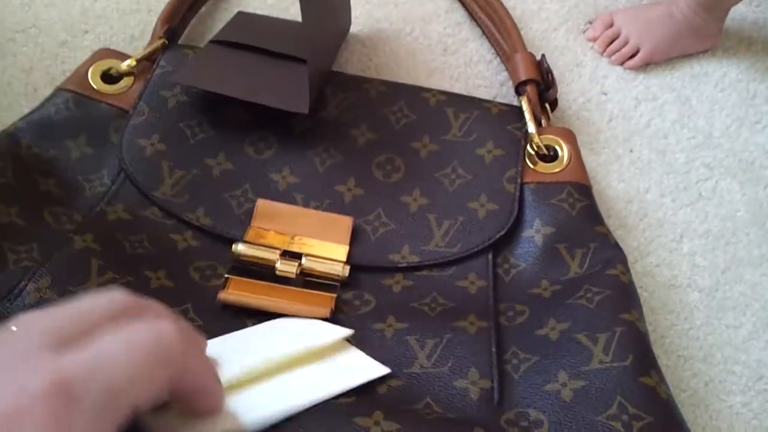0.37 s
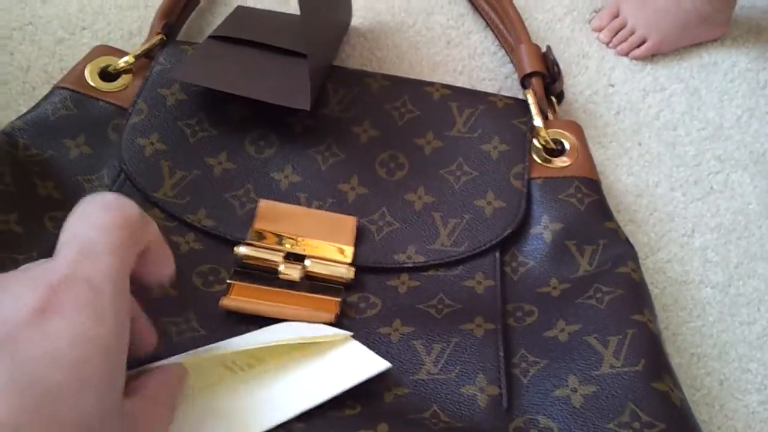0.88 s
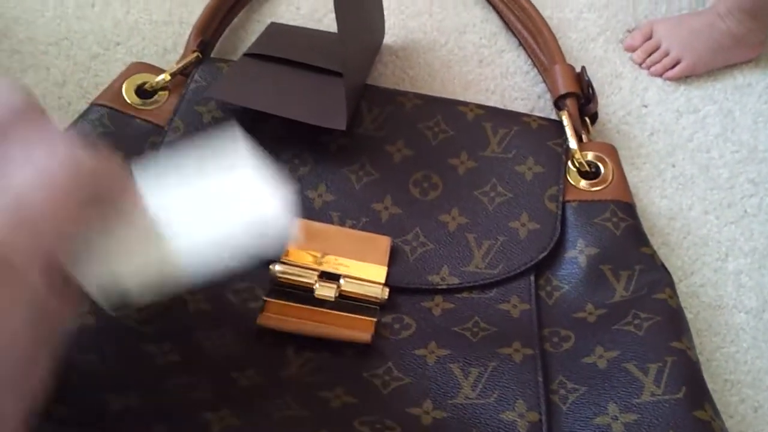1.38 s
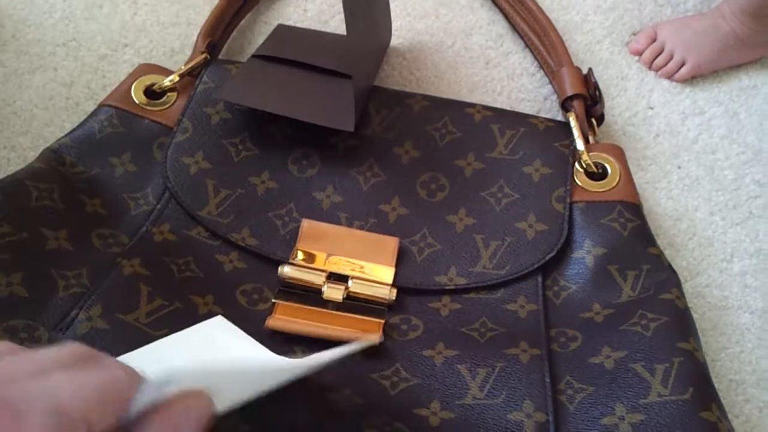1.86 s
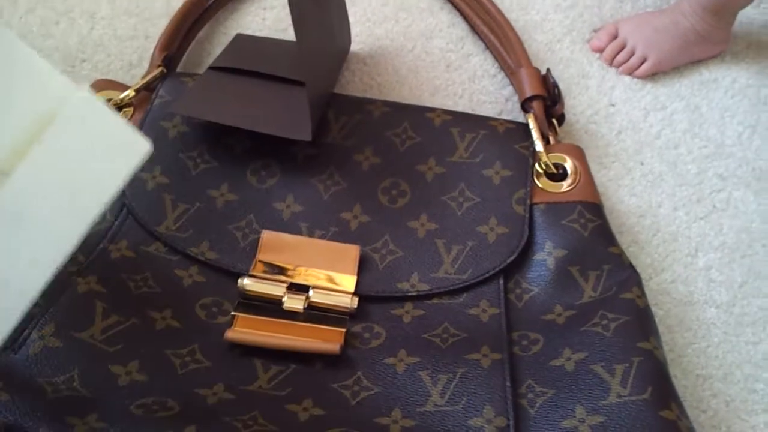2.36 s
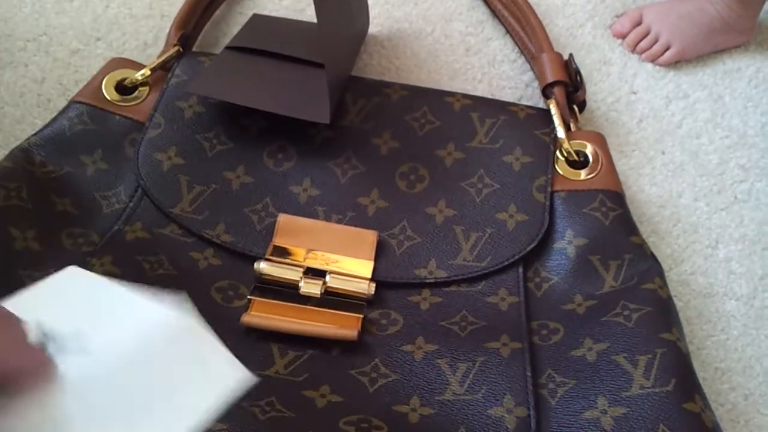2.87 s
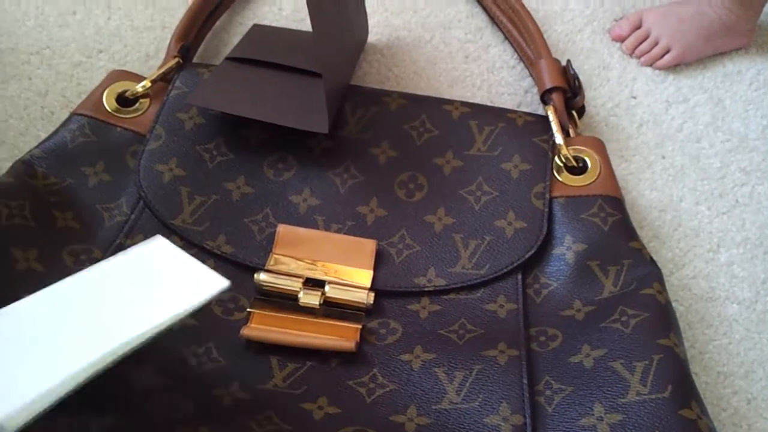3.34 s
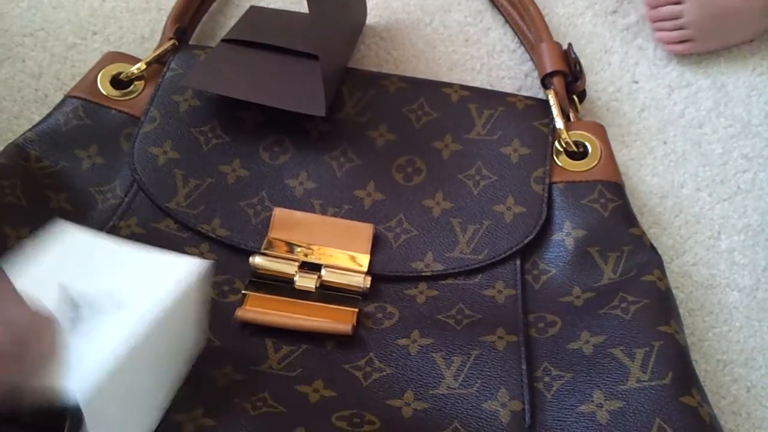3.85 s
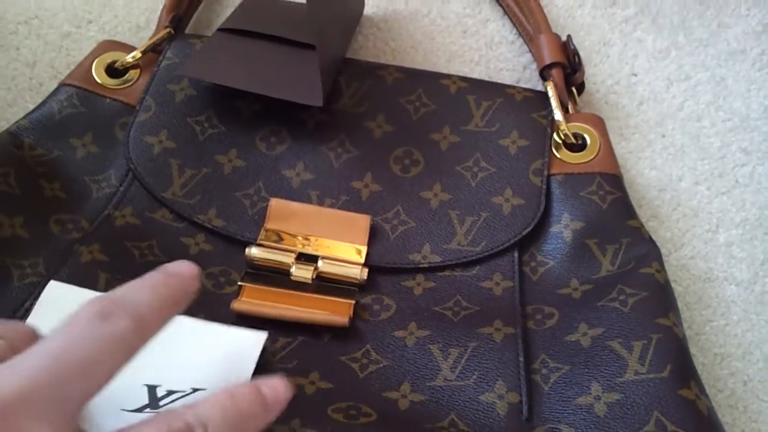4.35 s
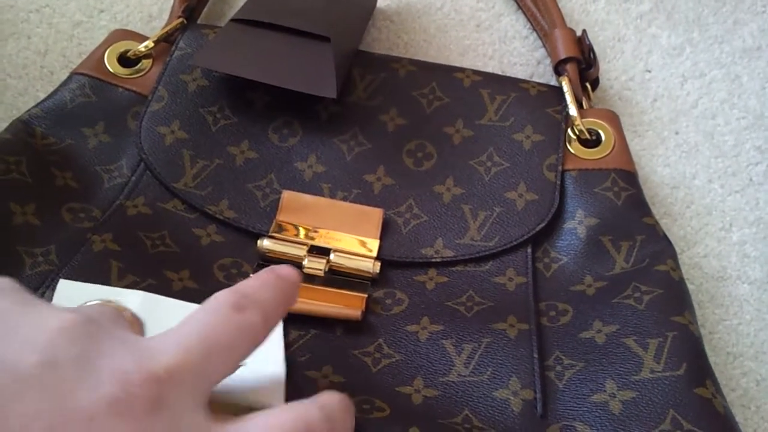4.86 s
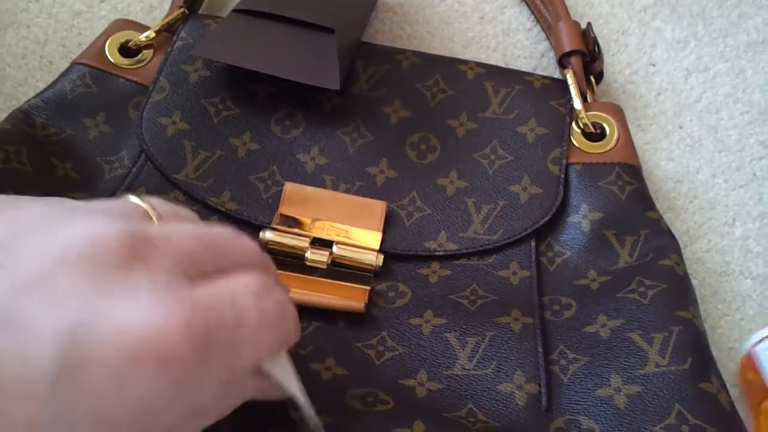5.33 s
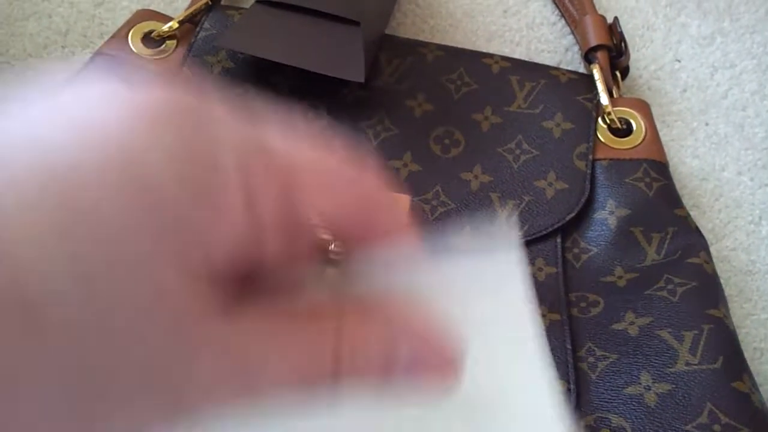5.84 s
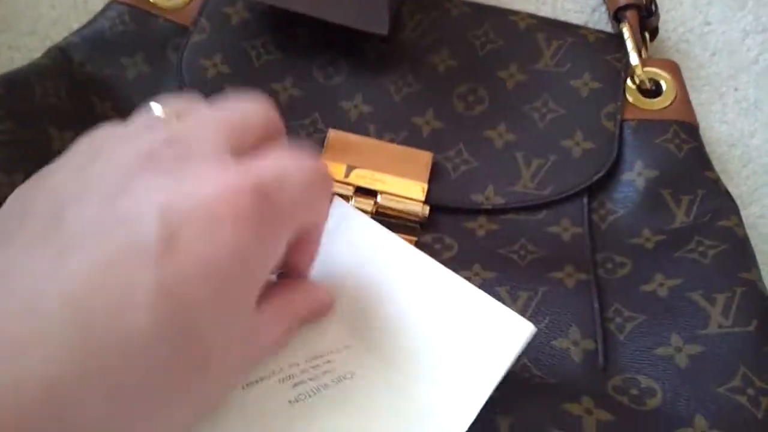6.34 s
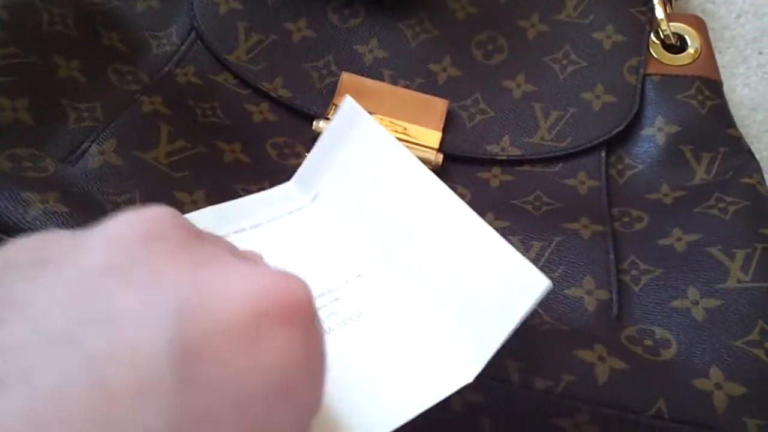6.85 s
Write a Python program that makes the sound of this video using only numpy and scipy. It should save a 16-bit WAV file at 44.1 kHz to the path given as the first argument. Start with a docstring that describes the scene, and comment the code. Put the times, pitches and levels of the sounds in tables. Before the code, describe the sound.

A soft, steady room hush with stiff paper handled very close to one microphone. Faint rustles and small ticks come first; around 0.4 s sharp crease snaps launch a bright, gritty slide of paper on card, fading by about 1 s. Light crinkles and clicks follow, with a strong snap at 1.55 s and a second harsh slide at 1.7-2.2 s, its loudest crack near 1.8 s. Quiet rustling until a third snapping slide at 3.25-3.7 s. From 3.8 to 4.7 s only small rustles, soft fingertip taps and a thin finger scuff. At 4.8 s a short slide, then the loudest snaps at 5.0-5.1 s, clipping slightly, and further rasping slides to 5.7 s. Duller, woody pops and low finger thumps at 5.5, 5.8 and 6.05 s, then rustling and light creases settle to hush, with a last small tick near 6.9 s. Very little reverberation.

```python
"""Faint papery rustling over a soft hush, then creases snapping and hard slides of paper on paper.
A stiff card and a folded sheet are slid apart, opened and tapped by hand, close up in a carpeted room.
Rubbing is clumped micro-slips, noise bursts that ring the card; snaps are short decaying pops and noise.
Fingertips thump softly in low-mid noise; a finger scuff is one narrow band of noise.
One microphone hears it all, and the loudest peaks clip."""
import sys
import numpy as np
from scipy import signal
from scipy.fft import rfft, irfft, next_fast_len
from scipy.io import wavfile
from scipy.ndimage import uniform_filter1d, map_coordinates

SR = 44100
rng = np.random.default_rng(int(sys.argv[2]) if len(sys.argv) > 2 else 0)


def ratio(d):
    """dB to gain"""
    e = np.asarray(d, float) / 20
    return 10 ** e


def bounce(signal):
    """Save signal as a 16-bit WAV file at the path given by the first command-line argument."""
    frames = np.transpose(np.atleast_2d(signal))
    limited = np.clip(frames, -1, 1)
    pcm = np.round(limited * 32767).astype(np.int16)
    wavfile.write(sys.argv[1], SR, pcm)


N = 307083  # samples

# colour of fingertips on paper, mostly low mids: pitch_hz, level_db
FINGER_COLOUR = [(20, -58), (60, -48), (120, -24), (250, -0.5), (500, -1), (900, -2), (1600, -23)]


def unit(x):
    """Scales to an rms of 1."""
    return x / np.sqrt(np.mean(x ** 2) + 1e-20)


def filtered(x, response):
    """Multiplies the spectrum of x by a response given as a function of frequency."""
    m = 2 * next_fast_len(N // 2 + 4096)
    spectrum = rfft(x, m) * response(np.fft.rfftfreq(m, 1 / SR))
    return irfft(spectrum, m)[..., :N]


def coloured(x, points):
    """Minimum-phase filter through (Hz, dB) points on a log axis, so that nothing sounds before a hit."""
    f, db = np.transpose(points)

    def response(hz):
        cepstrum = irfft(np.log(ratio(np.interp(np.log(hz + 1), np.log(f), db))))
        half = len(cepstrum) // 2
        # folding the cepstrum onto its causal half gives minimum phase
        cepstrum[1:half] *= 2
        cepstrum[half + 1:] = 0
        return np.exp(rfft(cepstrum))
    return filtered(x, response)


def tinted(x, points):
    """Zero-phase filter through (Hz, dB) points, so that neighbouring bands of noise add up smoothly."""
    f, db = np.transpose(points)
    return filtered(x, lambda hz: ratio(np.interp(np.log(hz + 1), np.log(f), db)))


def wobble(rate):
    """A smooth random curve with rate knots a second."""
    knots = rng.standard_normal(int(N * 2000 / SR) + 4)
    return map_coordinates(knots, [np.arange(N) * rate / SR])


def port(x):
    """The microphone port lifts three bands and slightly dips one."""
    # port bands: pitch_hz, width_hz, gain_db
    port_bands = [(3530, 58, -2), (4790, 770, 2.5), (5450, 100, 5), (7500, 1470, 4.5)]

    def response(f):
        return 1 + sum((ratio(db) - 1) * 1j * f * w / (c * c - f * f + 1j * f * w) for c, w, db in port_bands)
    return filtered(x, response)


def slips(rate, spread_db, life_s, clump_db, hiss):
    """Fibres catch and let go: noise bursts of very unequal size, in clumps, over smooth hiss."""
    when, size = rng.random((2, N))
    starts = (when < rate / SR) * ratio(-spread_db * np.log(size + 0.045))
    bursts = signal.lfilter([1], [1, -np.exp(-1 / (life_s * SR))], starts)
    clumps = ratio(clump_db * (wobble(22) + wobble(70)))
    return unit(clumps * (unit(bursts) + hiss) * rng.standard_normal(N))


def card(x, patchy_db):
    """The card rings at pitches that move as it is bent, and its colour flickers in patches."""
    # broad resonances of the card, unbent and fully sounding: pitch_hz, width_hz, gain_db
    card_modes = [(1450, 170, 6), (2150, 190, 10), (2850, 200, 3)]
    # how the card is held: time_s, stretch of its resonances (ratio), share of their gain in dB (0-1)
    grips = [(.3, 1, 0.85), (.95, 1.13, 0.93), (1.6, 1.07, 0.92), (2.25, 1, 1), (2.5, 0.85, 0),
             (3.2, 1, 0.83), (3.7, 1.07, 1), (4.2, 0.87, 0), (4.75, 1.06, 0.95), (5.1, 0.95, 0.58),
             (5.699, 1, 1), (5.85, 0.95, 0.18)]
    hz, t, z = signal.stft(x, SR, nperseg=512)
    s, stretch, share = np.transpose(grips)
    bent = hz[:, None] / np.interp(t, s, stretch)
    lift_db = sum(db / (1 + (2 * (bent - c) / w) ** 2) for c, w, db in card_modes)
    lift_db = lift_db * np.interp(t, s, share)
    across_pitch = uniform_filter1d(rng.standard_normal(z.shape), size=5, axis=0)
    patches = unit(uniform_filter1d(across_pitch, size=10, axis=1))
    return signal.istft(z * ratio(lift_db + patchy_db * patches), SR, nperseg=512)[1][:N]


def past(seconds):
    """Time beyond a moment, zero ahead of it."""
    return np.clip(seconds, 0, None)


def rustle_power(t):
    """Light handling swells, holds and settles: power of fibres, card, fingers and glide."""
    # rustles: full_from_s, full_to_s, fibres_db, card_db and fingers_db (both relative to fibres)
    rustles = [(0, 0.038, -43.5, -5.5, -11), (0.103, 0.122, -53, -10, -13), (0.283, 0.367, -46, -7, -9.5),
               (1.037, 1.072, -37, -1.5, -3.5), (1.138, 1.22, -47.5, -3.5, -10),
               (1.44, 1.567, -48, -6.5, -6.5), (1.572, 1.636, -48, -9, -6),
               (2.338, 2.338, -42.5, -5.5, -13.5), (2.43, 2.475, -53, 3, -6.5),
               (2.519, 2.543, -43, -3, -23.5), (2.615, 2.7, -47, -4.5, -19.5), (2.833, 2.863, -47, -1, -4),
               (2.993, 3.03, -46, -1, -8), (3.142, 3.17, -47, -0.5, -9), (3.217, 3.236, -37, -1.5, -13),
               (3.817, 3.8, -51, 3.5, 8), (3.865, 3.914, -41.5, 0, -16), (3.953, 4.044, -44, -4.5, -15),
               (4.18, 4.286, -59, -11, -3), (4.367, 4.448, -49, -5.5, -8), (4.58, 4.674, -54.5, -1, 2.5),
               (5.27, 5.348, -27, -5.5, -19), (4.78, 4.753, -37.5, -2.5, -15), (4.984, 4.99, -35, -6, -26),
               (5.635, 5.686, -39.5, 4, -8.5), (5.755, 5.81, -46, -3, -1), (5.82, 5.885, -37, -9, -25),
               (5.923, 5.961, -41, -1.5, -12), (6.067, 6.17, -36.5, -1, -19),
               (6.212, 6.234, -33, -8.5, -18), (6.305, 6.423, -33.5, -8.5, -16),
               (6.46, 6.562, -41, -3, -10.5), (6.758, 6.795, -46.5, -2, -12), (6.826, 6.963, -56, 5.5, 3)]
    swell_db_per_s, settle_db_per_s = 254, 200
    power = np.zeros((4, len(t)))
    for start, end, db, card_db, finger_db in rustles:
        shape = db - swell_db_per_s * past(start - t) - settle_db_per_s * past(t - end)
        glide = shape - 9.5 - card_db  # the less the card rings, the more the glide hisses
        power += ratio([shape, shape + card_db, shape + finger_db, glide]) ** 2
    return power


def slide_power(t):
    """A sheet on the card starts abruptly or speeds up, surges, then mostly fades until it lifts off."""
    # slides: touch_s, fastest_s (may precede touch), lift_off_s, level_db (of fibres at fastest_s), #
    # fade_db_per_s (before the bend of the fade below; a negative one makes the level keep rising until lift-
    # off)
    slides = [(0.447, 0.546, 0.98, -10, 48), (1.68, 1.834, 2.28, -10.5, 48.5),
              (3.254, 3.357, 3.71, -11, 66), (4.782, 4.808, 5.07, -15, 68), (5.082, 5.062, 5.235, -7, -5.5),
              (5.363, 5.36, 5.76, -10, 37.5)]
    speed_up_db, speed_up_s = 7.5, 0.13  # gain over the time ahead of fastest_s
    jerk_db, jerk_s = 7.5, 0.042  # extra surge around fastest_s and its time constant
    touch_db_per_s, lift_db_per_s = 1497, 359  # steepness of start and stop
    power = np.zeros((3, len(t)))
    for touch, fastest, lift, db, fade_db in slides:
        surge = jerk_db * np.exp(-np.abs(t - fastest) / jerk_s)
        edges = touch_db_per_s * past(touch - t) + lift_db_per_s * past(t - lift)
        after = past(t - fastest)
        fade = fade_db * after * (0.58 + 1.5 * after)  # bends further with time
        rest_db = db - jerk_db  # fastest level without the surge
        speed = rest_db - speed_up_db * np.clip((fastest - t) / speed_up_s, 0, 1) - fade
        # the card takes part of the surge and follows the fade a little less
        ring = speed - 4.5 + 0.35 * surge + 0.088 * (rest_db - speed)
        press = -47.5 + 0.33 * (speed + surge)  # finger pressure follows the slide loosely
        power += ratio(np.array([speed + surge, ring, press]) - edges) ** 2
    return power


def strokes():
    """Sums the powers of slides and rustles into gains of fibres, card, fingers and glide."""
    t = np.arange(0, N + 64, 32) / SR
    power = rustle_power(t)
    power[:3] += slide_power(t)
    return [np.interp(np.arange(N) / SR, t, np.sqrt(p)) for p in power]


def rubbing():
    """One stream of slips feeds fibre hiss and card ring; a glide hiss and finger shuffle join in."""
    # colours of fibre hiss, ringing card and smooth glide: pitch_hz, level_db
    fibre_colour = [(1500, -119), (2600, -26.5), (3500, 3), (6000, 1), (9000, 0), (12000, -5.5),
                    (15500, -12)]
    board_colour = [(100, -70), (400, -40), (800, -8.5), (1300, -2.5), (2400, -0.5), (3200, -2.5),
                    (5000, -38)]
    glide_colour = [(3000, -34), (6000, -10), (8000, 3), (11000, -4), (15500, -6.5)]
    hiss, ring, fingers, glide = strokes()
    sheen = glide * unit(tinted(rng.standard_normal(N), glide_colour))
    stream = slips(rate=650, spread_db=3.3, life_s=0.0008, clump_db=1.2, hiss=1.3)
    stream = port(card(stream, patchy_db=2.35))
    shuffle = slips(rate=90, spread_db=3.5, life_s=0.005, clump_db=1.2, hiss=1.1)
    fibres = hiss * unit(tinted(stream, fibre_colour))
    board = ring * unit(tinted(stream, board_colour))
    return sheen + fibres + board + fingers * unit(coloured(shuffle, FINGER_COLOUR))


def air():
    """The steady hush of room and microphone: coloured noise at -54 dB rms."""
    # colour of the hush: pitch_hz, level_db
    hush_colour = [(15, -43), (25, -21), (75, -7), (322, 12.5), (1950, 5), (4040, 3.5), (5880, -7),
                   (7910, -1.5), (15500, -9)]
    return ratio(-54) * unit(coloured(rng.standard_normal(N), hush_colour))


def snaps():
    """A crease gives way: a few cycles at its pitch with a rattle, a flat slap, a crack and a low thump."""
    # creases and taps: start_s, level_db, pitch_hz, thump_db and crack_db (both relative to level_db);
    # the levels are balanced further by the fixed trims below
    crease_hits = [(0.243, -28, 840, -1, -21), (0.292, -22.5, 2900, -9.5, -4.5), (0.413, 3, 1600, -47, -11),
                   (0.442, -3, 3950, -54, 3), (0.501, -2.5, 4400, -34, 6), (0.54, -10, 5500, -35, 6),
                   (0.719, -11, 2450, -26, -9), (0.939, -15.5, 970, -27, -21),
                   (1.058, -14, 1750, -17, -6.5), (1.102, -15.5, 6110, -38, -6),
                   (1.199, -23, 3680, -24, -1), (1.326, -29, 1250, -11, -3), (1.373, -12.5, 1720, -14, -24),
                   (1.497, -27, 3550, -13, -15), (1.551, 2, 3770, -17.5, -22.5),
                   (1.671, -3.5, 1610, -50, -35), (1.718, -9, 4700, -45, 1), (1.741, -6, 2160, -60, 1),
                   (1.791, -11, 5170, -48, 8), (1.824, 9, 4820, -47, -8.5), (2.059, -16, 2280, -10.5, -24),
                   (2.154, -16.5, 2300, -16, -3), (2.22, -18.5, 2660, -20, -7),
                   (2.262, -25, 2700, -23, -20), (2.476, -29.5, 2320, -24, -8), (2.52, -17, 4530, -44, -18),
                   (2.802, -26, 2040, -1, -1), (2.858, -23.5, 5970, -14, -1.5),
                   (2.943, -29, 960, -4.5, -28), (2.986, -41, 400, 2, -20), (3.14, -29.5, 4100, -32, -2),
                   (3.252, -7, 3430, -49, -5), (3.314, -8, 4860, -47, 0), (3.349, -5, 3180, -31, -3.5),
                   (3.778, -25.5, 1230, 0, -20), (3.822, -13.5, 2870, -22, -35),
                   (3.85, -17, 2150, -24, -25), (3.895, -18, 3530, -43, -9), (3.957, -18.5, 5460, -20, -9),
                   (4.047, -27, 3560, -15, 1), (4.106, -28.5, 3430, -13.5, -10),
                   (4.565, -25.5, 1860, -11, -26), (4.607, -27, 1920, -12, -22),
                   (4.647, -29.5, 927, -7.5, -33), (4.672, -21, 2860, -37, -9), (4.735, -30, 3920, -16, -9),
                   (4.765, -14, 4070, -44, -22), (4.784, -8, 5900, -31, 0), (5.007, 1, 3630, -29, -13),
                   (5.013, -6.5, 2700, -14, -2.5), (5.023, -17, 3720, -34, -8), (5.07, 11, 5740, -25, -7),
                   (5.138, -0.5, 4700, -38, 0), (5.326, -14.5, 5450, -33, 4.5), (5.358, 0, 4700, -25, 2),
                   (5.535, -3, 844, -21, -13), (5.558, -5.5, 3050, -38, -4), (5.582, -5.5, 2270, -36, -2),
                   (5.819, 0.5, 715.7, -21, -17), (5.84, -17, 649, -5.5, -17), (6.056, -6, 747, -9.5, -44),
                   (6.075, -19.5, 760, -6, -25), (6.135, -10.5, 4350, -24, -8), (6.146, -8, 3580, -11, -8),
                   (6.357, -35, 694, 2, -15), (6.404, -27.5, 1510, -6, -12), (6.884, -31, 443, -34, -19),
                   (6.91, -18.5, 1670, -13.5, -41)]
    ring, crack, thump, flick = np.zeros((4, N + SR))
    t = np.arange(SR // 16) / SR
    rise = 1 - np.exp(-t / 0.00055)
    # each decay falls 60 dB in the time that divides t
    slap_decay = ratio(-60 * t / 0.018)
    crack_decay = ratio(-60 * t / 0.019) + ratio(-1.5 - 60 * t / 0.12)
    thump_decay = ratio(-60 * t / 0.039)
    for s, db, hz, thump_db, crack_db in crease_hits:
        cycles = max(13.5 * (hz / 1000) ** 0.6, 3)  # higher pitches ring for more cycles
        noise = rng.standard_normal((4, len(t)))
        band_hz = np.clip([hz / 1.54, hz * 1.29], 100, 12000)
        rattle = unit(signal.sosfilt(signal.butter(2, band_hz, "band", fs=SR, output="sos"), noise[0]))
        rattle = ratio(-8.5 - 60 * t * hz / (2.54 * cycles)) * rattle
        pop = ratio(-60 * t * hz / cycles) * np.sin(2 * np.pi * hz * t)
        first = round(s * SR)
        at = slice(first, first + len(t))
        ring[at] += ratio(db - 2.5) * rise * (pop + rattle)
        crack[at] += ratio(db + crack_db - 12.5) * rise * crack_decay * noise[1]
        thump[at] += ratio(db + thump_db + 15) * rise * thump_decay * noise[2]
        flick[at] += ratio(db - 3.5) * rise * slap_decay * noise[3]
    pops = coloured(ring[:N], [(50, -31), (300, 0)])
    slap = coloured(flick[:N], [(100, -56), (500, -50), (1100, -1), (3800, 2), (6000, -23.5)])
    bright = coloured(crack[:N], [(200, -61), (1200, -2.5), (3000, 4.5), (5000, 2.5),
                                  (9500, 6.5), (15500, -6.5)])
    return pops + port(bright) + slap + coloured(thump[:N], FINGER_COLOUR)


def room(x):
    """The soft room answers with a noise tail in which each frequency dies at its own speed."""
    # time to fall by 60 dB: pitch_hz, decay_s
    room_decay = [(200, 0.18), (2000, 0.48), (10000, 0.14)]
    hz, t, z = signal.stft(rng.standard_normal(SR // 3), SR, nperseg=256)
    f, t60 = np.transpose(room_decay)
    fall = ratio(-60 * t / np.interp(hz, f, t60)[:, None])
    tail = signal.istft(z * fall, SR, nperseg=256)[1]
    delayed = np.pad(x, (300, 0))  # samples
    return signal.fftconvolve(delayed, tail / np.linalg.norm(tail))[:N]


def scuffs():
    """A fingertip drags briefly and excites one band of the paper."""
    # finger scuffs and a squeak: start_s, length_s, pitch_hz, width_hz, level_db
    finger_drags = [(4.566, 0.075, 1966, 45, -44.5), (5.456, 0.04, 716, 497, -26),
                    (5.735, 0.036, 626, 356, -39), (6.15, 0.04, 478, 297, -35.5)]
    out, t = np.zeros(N), np.arange(N) / SR
    for s, length, hz, width_hz, db in finger_drags:
        band = filtered(rng.standard_normal(N), lambda f: 1 / (1 + (2 * (f - hz) / width_hz) ** 4))
        swell = np.sqrt(np.sin(np.pi * np.clip((t - s) / length, 0, 1)).clip(0))
        out += ratio(db) * swell * unit(band)
    return out


def scene():
    """Paper, the hush, and a faint room behind the snaps, alike in both channels."""
    hits = snaps()
    mix = rubbing() + scuffs() + hits + ratio(-14) * room(hits) + air()
    return np.tile(mix, (2, 1))


def patchy_noise(x):
    """A faint noise that follows the spectrum of x and flickers in patches of pitch and time."""
    z = signal.stft(x, nperseg=1024)[2]
    chance = rng.standard_normal((2, *z.shape))
    across_pitch = uniform_filter1d(chance[0], size=14, axis=0)
    patches = unit(uniform_filter1d(across_pitch, size=3, axis=1))
    grains = np.abs(z) * chance[1] * ratio(-33.5 + 7.8 * patches)
    return signal.istft(grains, nperseg=1024)[1][:N]


def roll_off(x):
    """The treble ends steeply here."""
    return signal.sosfilt(signal.butter(12, 15690, fs=SR, output="sos"), x)


def record(dry):
    """The input clips at full scale, gains a faint patchy noise opposite in left and right, loses its top."""
    clipped = np.clip(dry, -1, 1)
    noise = patchy_noise(clipped[0])
    pair = clipped + [noise, -noise]
    finished = filtered(pair, lambda hz: hz < 15700)
    return roll_off(finished)


dry = scene()
out = record(dry)
bounce(out)
```